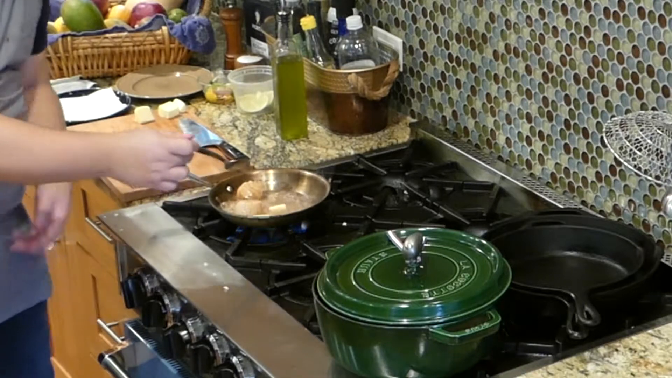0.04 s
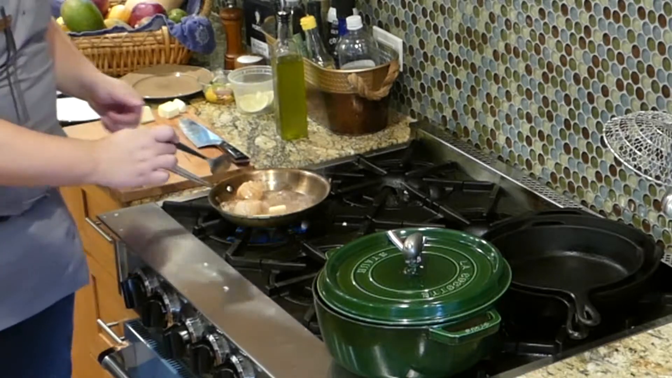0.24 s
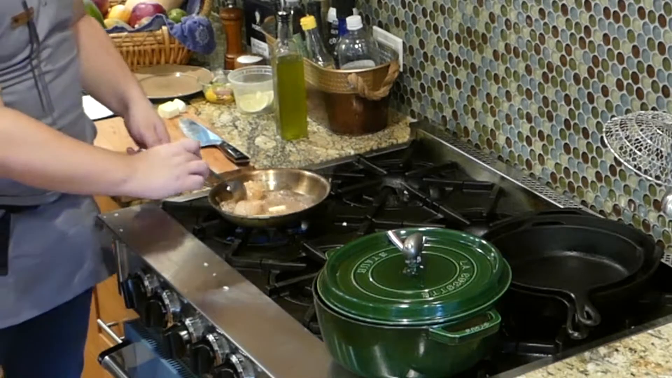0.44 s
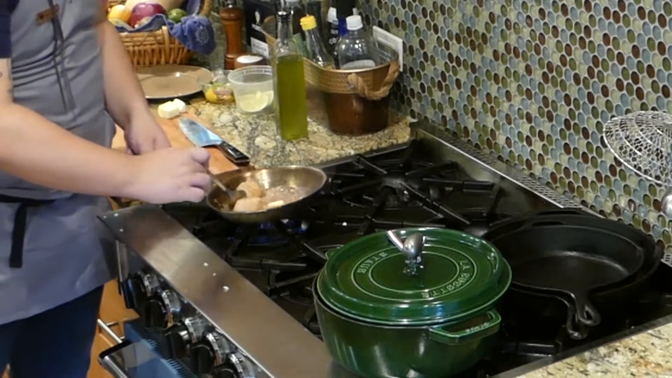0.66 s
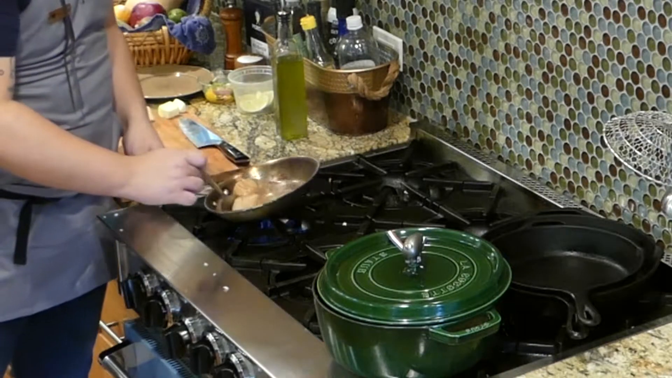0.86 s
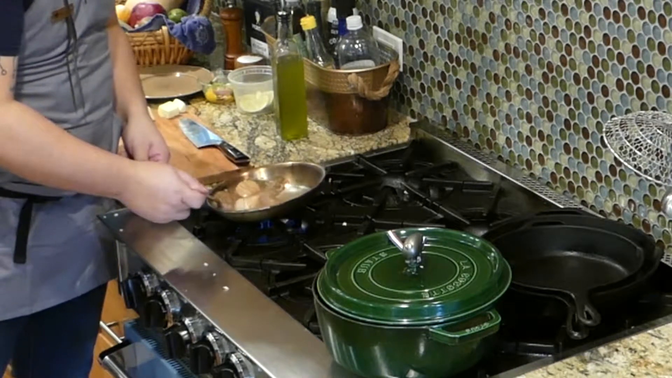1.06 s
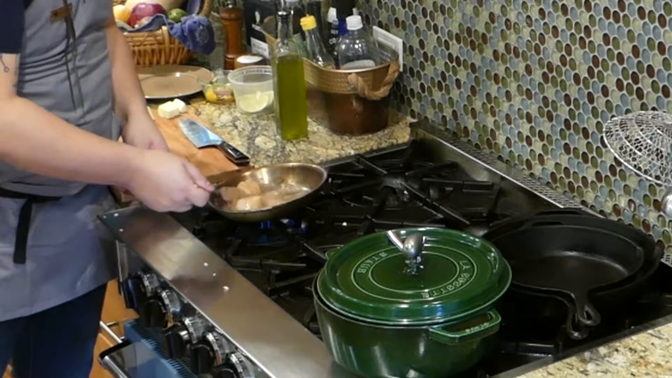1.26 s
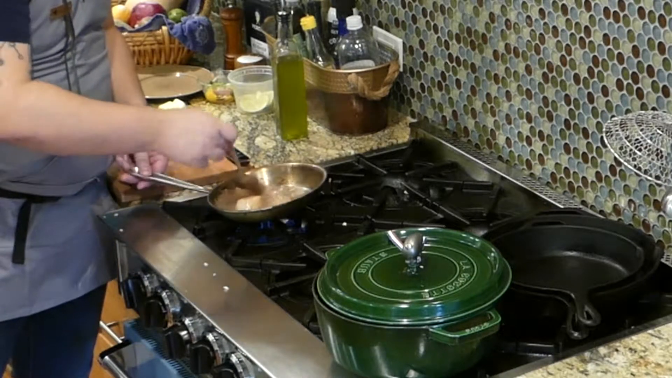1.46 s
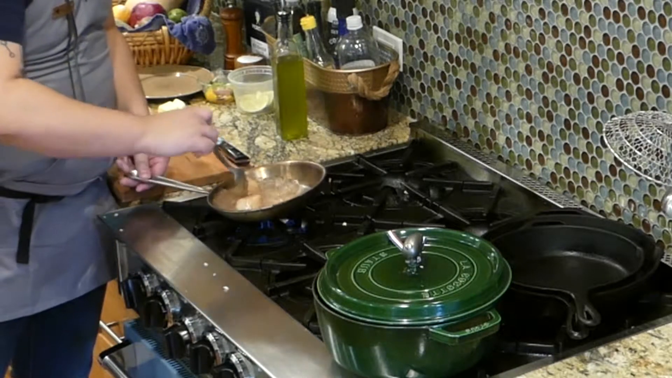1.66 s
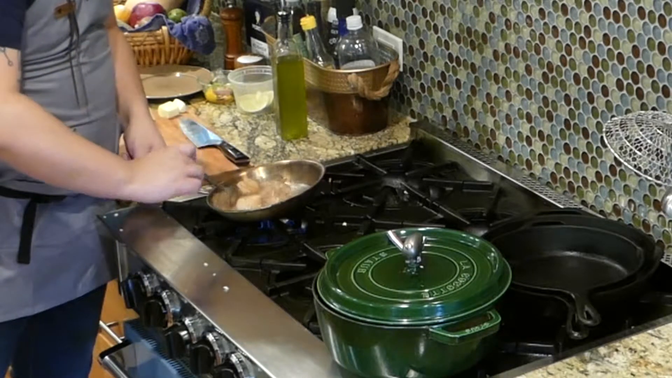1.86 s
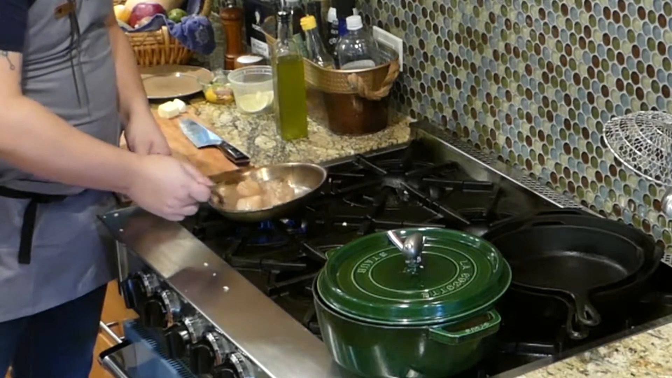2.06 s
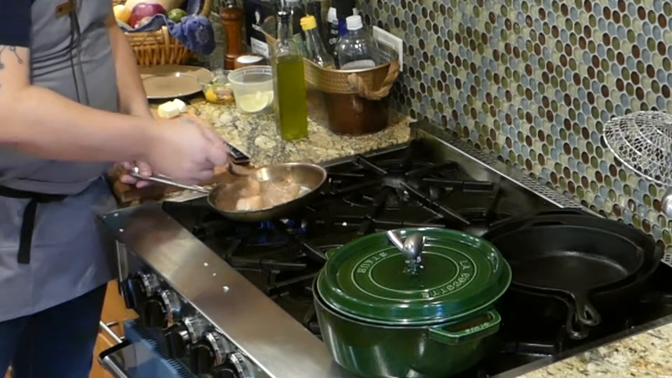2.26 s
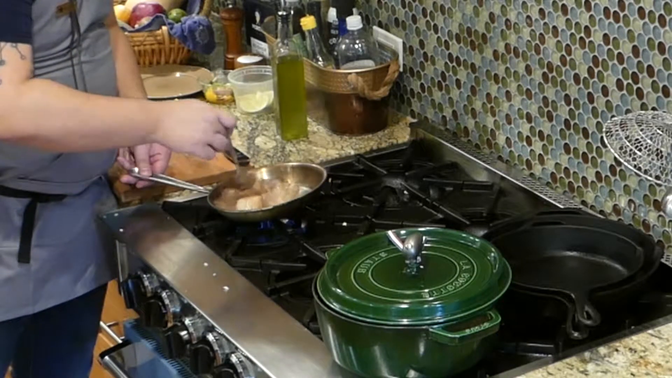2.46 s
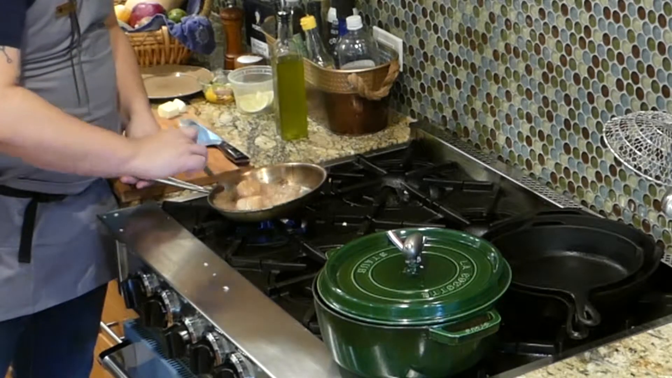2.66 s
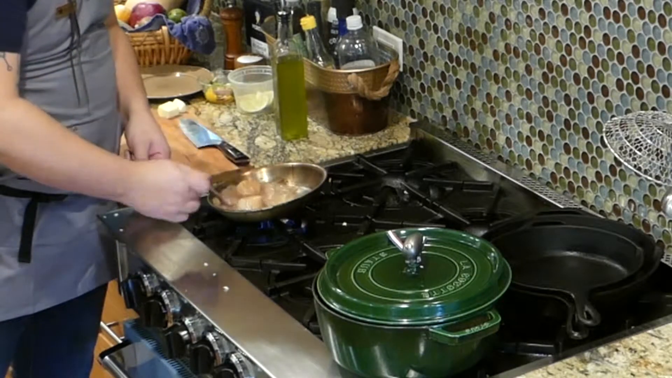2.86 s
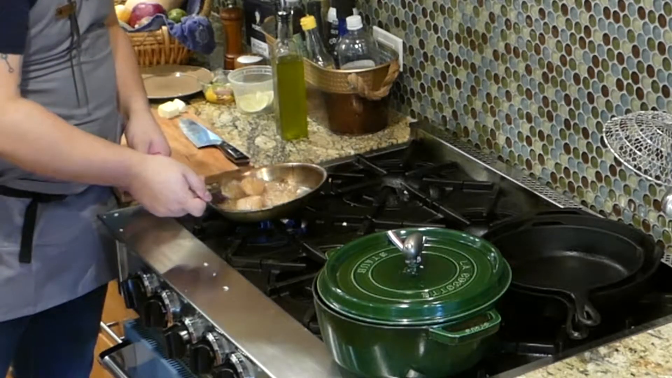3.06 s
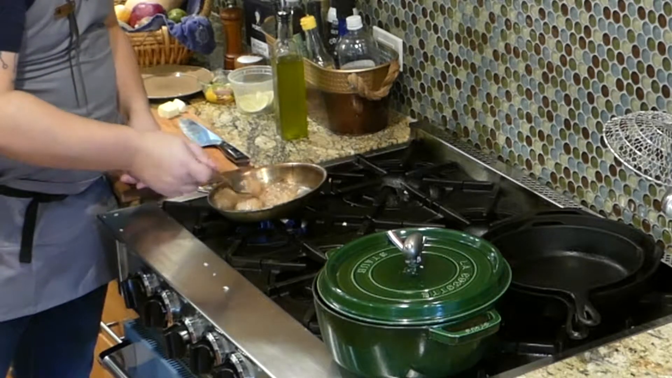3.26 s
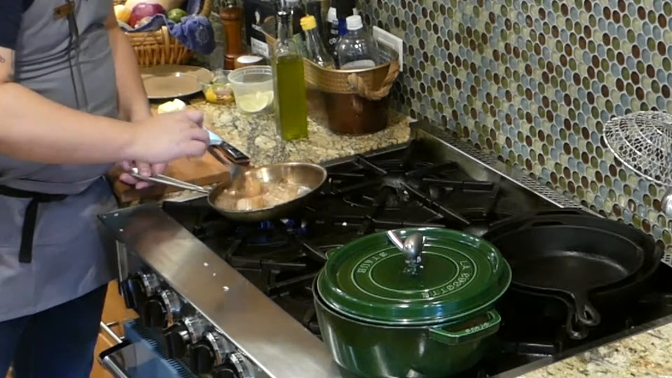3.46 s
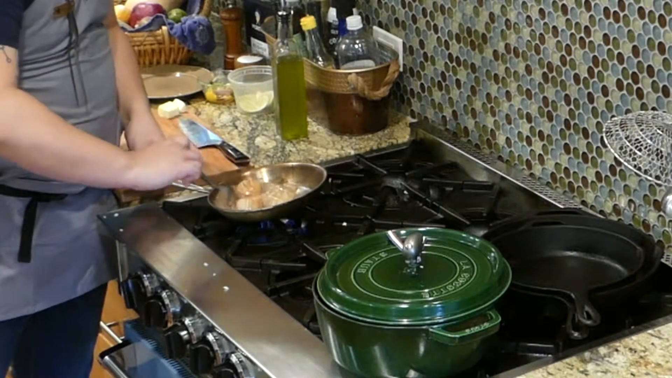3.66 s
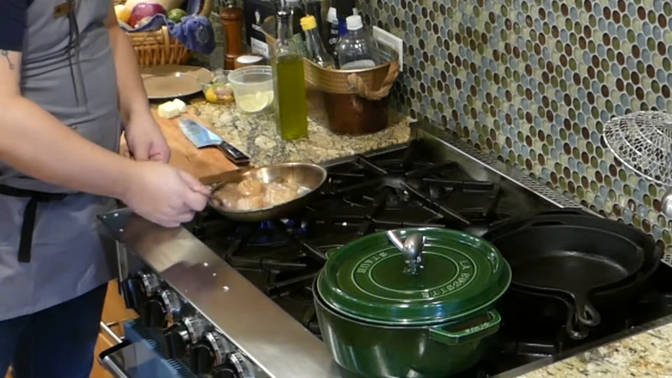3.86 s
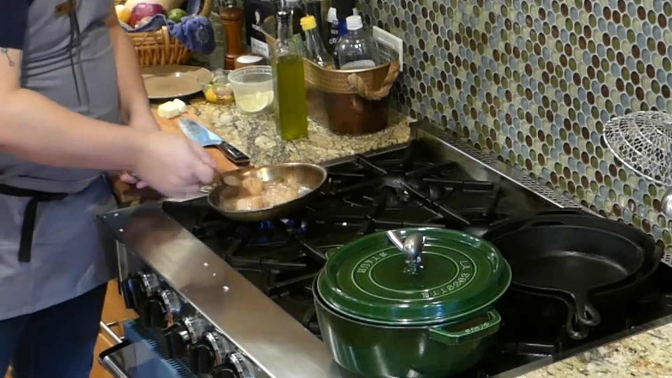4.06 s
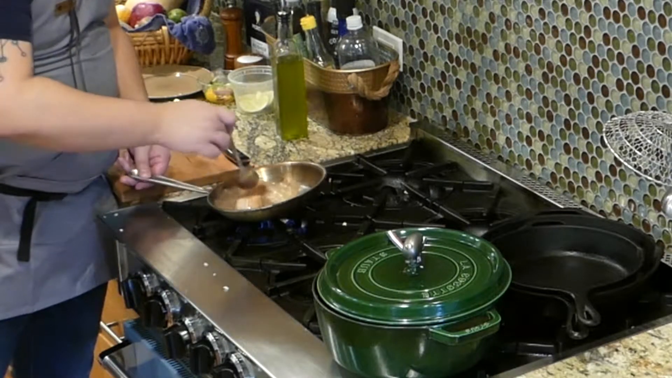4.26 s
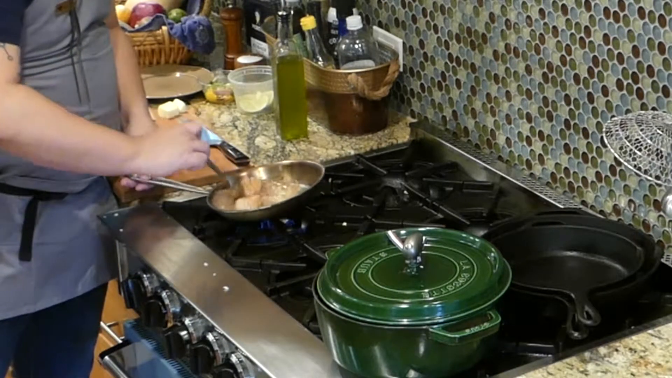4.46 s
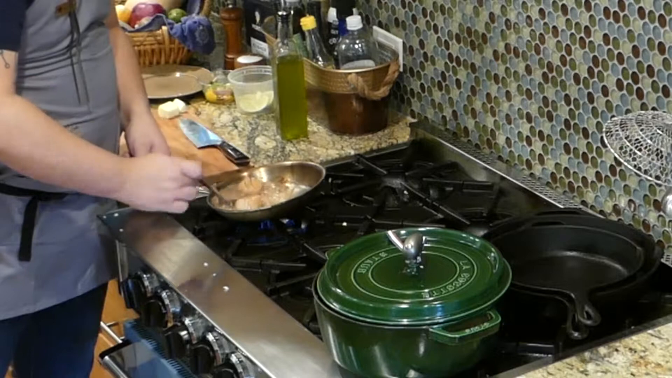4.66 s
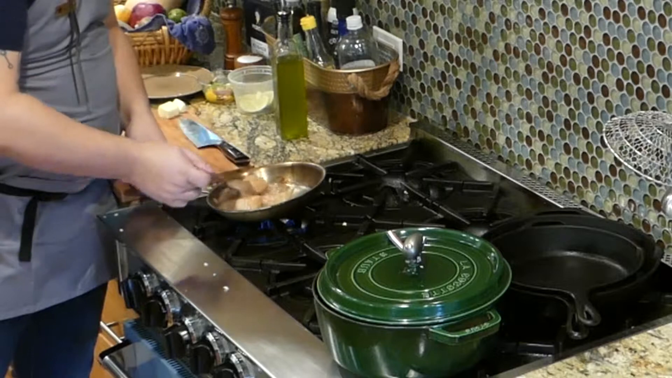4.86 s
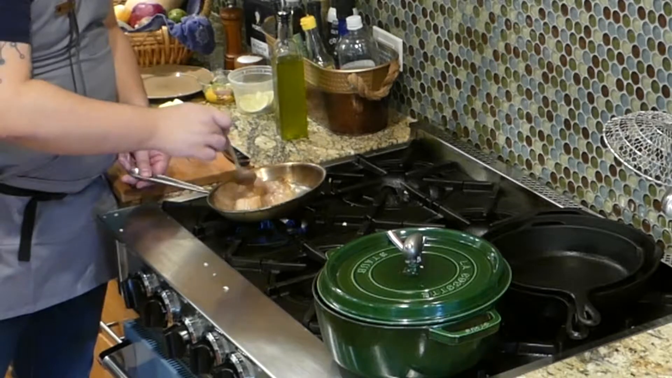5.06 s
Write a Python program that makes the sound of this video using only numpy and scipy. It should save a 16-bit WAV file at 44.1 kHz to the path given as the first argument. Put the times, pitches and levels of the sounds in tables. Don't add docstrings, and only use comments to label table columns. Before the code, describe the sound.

A five-second stretch in a tiled kitchen, picked up in stereo by a camera about two metres away. From the very start butter fizzes, froths and crackles in a steel skillet, with sharp tiny spits, over a steady low roar of hood fan and gas flame. At 0.6 s the pan rocks onto the grate with a short rattling metallic clunk; the fat then washes and gurgles louder until about 1.3 s, with a cluster of pops and a small round drip near 1.15 s. The boil is liveliest around 1.45 s. Then a spoon scoops rhythmically: damped base knocks at 1.95, 2.8, 3.75 and 4.65 s, each followed about 0.2 s later by a rim clink, at 2.1, 3.0, 3.95 and 4.8 s, the first dull, the third brighter. Small drips of poured fat fall near 4.5 s, and a last sizzling swell comes at 4.9 s. Short hard-walled echoes surround everything.

```python
import sys
import numpy as np
from scipy import signal
from scipy.fft import rfft, irfft, next_fast_len
from scipy.io import wavfile
from scipy.ndimage import uniform_filter1d

SR = 44100
rng = np.random.default_rng(int(sys.argv[2]) if len(sys.argv) > 2 else 0)


def pcm_store(signal):
    levels = np.round(np.clip(np.atleast_2d(signal), -1, 1) * 32767)
    wavfile.write(sys.argv[1], SR, levels.astype(np.int16).T)


def invert_db(x):
    u = np.asarray(x, float) / 20
    return 10 ** u


N = 225684

# (frequency [Hz], density [dB per Hz])
HOOD_SPECTRUM = [(12, -70), (20, -42), (53, -39), (72, -12.5), (133, -2), (242, 1), (301, 3), (498, -2.5),
                 (536, -1), (566, -9), (619, 0), (1100, -14.5), (1500, -13), (1950, -33), (3300, -120)]
# (frequency [Hz], density [dB per Hz])
FRY_SPECTRUM = [(700, -17), (1100, -3.5), (1300, -7), (2300, -3), (4000, -1), (6000, -1), (7200, -2),
                (8100, -5.5), (9200, 0.5), (11000, -1.5), (13500, -6), (16000, -14.5)]
# (time [s], vigour of the boil [dB])
PAN_HEAT = [(0, 0), (.5, 0), (1.25, 1.5), (1.45, 4.5), (1.8, 1.5), (2.1, 2), (2.45, 0), (2.8, 2),
            (3.3, 0.5), (4.0, -0.5), (4.7, -1.5), (5.12, 0.5)]
# (time [s], hold [s], swell [dB], bubble pitch [Hz])
FAT_SURGES = [
    (0.67, 0.15, 3.5, 2900),
    (0.88, 0.25, 6, 3400),
    (.84, 0.29, 2.5, 3800),
    (1.65, 0.21, 1.5, 9500),
    (1.1, .06, 7, 1100),
    (1.34, 0.52, 0.5, 7200),
    (2.42, 0.48, 2, 4000),
    (4.47, 0.061, 6.5, 2000),
    (4.89, 0.14, 5, 4600),
]
# (time [s], peak level [dB], pitch [Hz])
FAT_SPITS = [(.0428, -20, 9800), (0.206, -14, 9600), (0.291, -23, 4320), (.922, -19, 4000),
             (.971, -15, 3320), (1.014, -18, 3500), (1.112, -23, 3200), (1.141, -25, 4500),
             (1.156, -21, 3500), (1.168, -18, 2980), (1.202, -20, 3700), (1.428, -21, 5500),
             (1.8838, -18, 7600), (2.0306, -24, 6000), (2.491, -25, 4060), (3.177, -24, 9500),
             (3.19, -21, 10000), (3.268, -24, 10000), (3.412, -18, 10200), (3.673, -28, 3540),
             (3.689, -22, 6000), (3.7232, -14, 10000)]
# (time [s], peak level [dB], pitch [Hz], T60 [s])
SPOON_DRIPS = [
    (.968, -42, 2420, 0.066),
    (1.159, -28, 1700, 0.045),
    (1.164, -46, 1796, 0.033),
    (4.488, -39, 5500, .03),
    (4.523, -39, 2300, 0.032),
    (4.528, -33, 1650, 0.024),
    (4.542, -35, 1350, 0.023),
]
# (time [s], strength [dB], brightness [dB per octave], pitch the struck spot alters [Hz], by [dB])
GRATE_KNOCKS = [
    (.6248, -22.5, -0.5, 6500, -8.5),
]
BASE_KNOCKS = [
    (1.9421, -27.5, 0.3, 1400, 3.5),
    (2.7949, -22.5, -1, 1460, -7.5),
    (3.7529, -23, 0.26, 840, -4.5),
    (4.629, -23.5, 1, 930, 2.5),
]
RIM_KNOCKS = [
    (2.118, -25.5, -2.5, 650, -15),
    (2.9898, -24, -0.86, 1250, -4.5),
    (3.9342, -23, 0.43, 2920, 0),
    (4.801, -23.5, -1.8, 6300, 11.5),
]
# (frequency [Hz], level [dB], T60 [s])
GRATE_MODES = [(1295, -5.5, 0.1), (1526, 6.5, 0.058), (1700, -14, .036), (1910, -3, 0.072),
               (2390, -4, 0.029), (2470, -14, 0.027), (2974, -1.5, 0.02), (2895, 4.5, 0.043),
               (3380, -4.5, 0.047), (3710, -9, 0.032), (4260, -13, .04), (4550, -3, 0.036),
               (5160, -9.5, 0.35), (7100, -11, 0.041), (9100, -15, .031)]
# (frequency [Hz], level [dB], T60 [s])
BASE_MODES = [(189.8, -22, 0.48), (237.4, -15.5, 0.18), (353, -10, 0.097), (477, -9, 0.024),
              (756, -11.5, 0.15), (896, -7, 0.059), (1234, -5.5, 0.071), (1465, 1.5, 0.067),
              (1884, -15, 0.048), (2104, -6, 0.041), (2520, -1, 0.011), (3060, -2.5, 0.016),
              (3310, -7, 0.043), (3960, -9, 0.21), (4380, -1, 0.034), (4960, -0.5, .08),
              (5200, -7.5, 0.059), (6380, -7.5, 0.13), (7160, -9, 0.03), (9480, -11.5, 0.034),
              (10440, -12.5, 0.024)]
RIM_MODE_HZ = (470, 740, 800, 870, 1210, 1380, 1690, 1975, 2300, 2535, 2880, 3185, 3935, 4320, 4990, 5252,
               6050, 6706, 7114, 8750, 10450)
RIM_MODE_DB = (-20.5, -8.5, -8, -16.5, -6, -13.5, -2.5, -1, -7, -2, 3, -7.5, 0, -7.5, -9.5, -3.5, -6, -2.5,
               -4, -13, -4.5)
RIM_MODE_T60 = (.08, .07, .07, .06, .1, .06, .07, .1, .07, .09, .085, .14, .17, .1, .07, .13, .08, .1, .07,
                .04, .05)
# (frequency [Hz], gain [dB])
GRATE_GAIN = [(1300, -1), (1500, 2), (2800, -0.5), (5000, -2.5)]
# (frequency [Hz], gain [dB])
BASE_GAIN = [(250, -4.5), (800, -1.1), (2800, 0), (5500, -5)]
# (frequency [Hz], gain [dB])
RIM_GAIN = [(780, -0.1), (2900, -0.5), (6500, -4.5), (10400, -4)]
# (frequency [Hz], T60 [s])
KITCHEN_T60 = [(200, 0.59), (1000, 0.73), (3000, 0.56), (6000, 0.35), (12000, 0.053)]
# (frequency [Hz], side minus diffuse mid [dB])
STEREO_WIDTH = [(30, -3), (110, -17), (200, -23.5), (380, -16), (700, -5.5), (1300, -4.5), (2400, -7.5),
                (3600, -9), (5000, -20.5), (8000, -16), (15000, -15)]
# (frequency [Hz], width [Hz], gain [dB])
EQUALISER_DIPS = [(584.5, 63, -26), (2658, 96, -55), (1066, 290, -6.5)]

SURGE_RISE_S, SURGE_FALL_S, SURGE_OCTAVES = 0.025, 0.077, 0.66
SLOSH_DB, SLOSH_HOLD_S, SLOSH_HZ = 3, 0.068, 2270
SPIT_CYCLES, SPIT_DB, HIGH_SPIT_DB = 8, 2.5, -2
PIVOT_HZ, SPOT_OCTAVES, SCATTER_DB = 2000, 0.25, 1.5
SWELL_CYCLES = 2.8
ONSET_S, CRACK_T60 = 0.0009, 0.018
RATTLE_DB, RATTLE_T60 = 9, 0.2
ECHO_S, ECHO_DB, ECHO_HZ = 0.0044, 1.5, 5500
SHADOW_HZ, SHADOW_DB = 5600, -8
SPOON_ROOM_DB, FRY_ROOM_DB, FRY_ECHO_DB = -6.5, -7, -6.5


def colour(x, table):
    hz, db = np.transpose(table)
    size = next_fast_len(x.shape[-1])
    f = np.maximum(np.arange(size // 2 + 1) * SR / size, 1)
    gain = invert_db(np.interp(np.log(f), np.log(hz), db))
    return irfft(rfft(x, size) * gain, size)[..., :x.shape[-1]]


def ring(x, hz, t60):
    pole = np.exp(2j * np.pi * min(hz, SR / 2.2) / SR - np.log(1000) / (t60 * SR))
    return signal.lfilter([1], [1, -pole], x).imag


def unit(x):
    return x / np.sqrt(np.mean(x ** 2))


def walk(rate):
    hold = int(SR / rate)
    steps = np.repeat(rng.standard_normal(N // hold + 1), hold)
    return 0.46 * uniform_filter1d(steps, hold)[:N]


def bursts(rate, spread_db):
    chance = rng.random((2, N))
    hit = np.flatnonzero(chance[0] < rate / SR)
    size = np.minimum(-np.log(1 - chance[1, hit]), 5)
    out = np.zeros(N)
    out[hit] = invert_db(spread_db * size) * (-1) ** hit
    return unit(out)


def bell(hz, centre_hz, octaves):
    return np.exp(-0.5 * (np.log2(hz / centre_hz) / octaves) ** 2)


def hood():
    roar = colour(rng.standard_normal((2, N)), HOOD_SPECTRUM)
    return invert_db(-49.5 + 0.35 * walk(2.8)) * unit(roar)


def vigour(hz):
    t = np.arange(0, N + 200, 200) / SR
    db = np.interp(t, *np.transpose(PAN_HEAT))
    knocks = [*GRATE_KNOCKS, *BASE_KNOCKS, *RIM_KNOCKS]
    sloshes = [(knock[0], SLOSH_HOLD_S, SLOSH_DB, SLOSH_HZ) for knock in knocks]
    for s, hold, swell_db, surge_hz in [*FAT_SURGES, *sloshes]:
        rise = np.clip((t - s) / SURGE_RISE_S, 0, 1)
        fall = np.exp(-np.maximum(t - s - SURGE_RISE_S - hold, 0) / SURGE_FALL_S)
        db = db + swell_db * bell(hz, surge_hz, SURGE_OCTAVES) * rise * fall
    return np.interp(np.arange(N) / SR, t, db)


def frying():
    cracks, seethe, out = bursts(1500, spread_db=2.3), walk(12), 0
    for hz in 700 * 2 ** np.arange(0, 4.6, 1 / 4):
        db = vigour(hz) + 0.81 * seethe + 1.7 * walk(25.2)
        clicks = bursts(0.6 * hz, spread_db=1.0) + 0.36 * cracks
        bubbles = unit(ring(invert_db(db) * clicks, hz, t60=6.1 / hz))
        out = out + np.sqrt(hz) * bubbles * np.sqrt(np.mean(invert_db(2 * db)))
    return invert_db(-42.0) * unit(colour(out, FRY_SPECTRUM))


def spits():
    out, t = np.zeros(N + SR), np.arange(SR // 5) / SR
    pops = [(*row, SPIT_CYCLES / row[2], 0) for row in FAT_SPITS]
    drips = [(*row, 1.5) for row in SPOON_DRIPS]
    for s, db, hz, t60, rise in pops + drips:
        swell = np.minimum(t * 8.6 / t60, 1)
        decay = invert_db(db + SPIT_DB + HIGH_SPIT_DB * (hz > 7000) - 60 * t / t60)
        tone = np.sin(2 * np.pi * hz * (t + rise * t ** 2))
        out[int(s * SR):][:len(t)] += swell * decay * tone
    return out[:N]


def blows(hits, modes, reach, crack_db, rattle_db, rattle_t60):
    out, t = np.zeros(N + SR), np.arange(SR // 2) / SR
    hz, db, t60 = np.transpose(modes)[:, :, None]
    reach_hz, reach_db = np.transpose(reach)
    db = db + np.interp(np.log(hz), np.log(reach_hz), reach_db)
    for s, strength_db, bright_db, spot_hz, spot_db in hits:
        chance = rng.standard_normal((2, len(modes), 1))
        tilt_db = bright_db * np.log2(hz / PIVOT_HZ)
        db_here = db + strength_db + tilt_db + spot_db * bell(hz, spot_hz, SPOT_OCTAVES)
        decay = invert_db(db_here + SCATTER_DB * chance[0] - 60 * t / t60)
        body = decay * np.sin(2 * np.pi * hz * (1 + 0.0011 * chance[1]) * t)
        body = body * np.minimum(t * hz / SWELL_CYCLES, 1)
        outline = [(hz.min() / 1.15, -60), *zip(hz.flat, db_here.flat), (hz.max() * 1.77, -60)]
        crowd = colour(rng.standard_normal(len(t)), outline)
        crack = invert_db(crack_db - 60 * t / CRACK_T60)
        rattle = invert_db(rattle_db - 60 * t / rattle_t60)
        onset = np.sin(np.pi / 2 * np.minimum(t / ONSET_S, 1)) ** 2
        out[int(s * SR):][:len(t)] += (body.sum(axis=0) + crowd * (crack + rattle)) * onset
    return out[:N]


def spoon_and_pan():
    rim_modes = list(zip(RIM_MODE_HZ, RIM_MODE_DB, RIM_MODE_T60))
    grate = blows(GRATE_KNOCKS, GRATE_MODES, GRATE_GAIN, 24.0, RATTLE_DB, RATTLE_T60)
    base = blows(BASE_KNOCKS, BASE_MODES, BASE_GAIN, 18.5, RATTLE_DB, RATTLE_T60)
    rim = blows(RIM_KNOCKS, rim_modes, RIM_GAIN, crack_db=8.5, rattle_db=3.5, rattle_t60=0.1)
    return signal.sosfilt(signal.butter(2, 140, "high", fs=SR, output="sos"), grate + base + rim)


def dull(hz, above_db):
    gain = invert_db(2 * above_db)
    response = signal.firwin2(127, [0, hz / 1.2, hz * 1.2, SR / 2], [1, 1, gain, gain], fs=SR)
    return signal.minimum_phase(response)


def kitchen(x, direct, echo, echo_s, room_db):
    t = np.arange(SR // 2) / SR
    room_hz, room_t60 = np.transpose(KITCHEN_T60)
    tail = 0
    for hz in 125 * 2 ** np.arange(0, 7.1, 1):
        t60 = np.interp(np.log(hz), np.log(room_hz), room_t60)
        edges = (hz / np.sqrt(2), min(hz * np.sqrt(2), SR / 2.2))
        band = signal.butter(1, edges, "band", fs=SR, output="sos")
        tail = tail + signal.sosfilt(band, rng.standard_normal((2, len(t)))) * invert_db(-60 * t / t60)
    tail = tail * np.clip((t - 0.002) / 0.012, 0, 1)
    tail = invert_db(room_db) * tail / np.sqrt(np.sum(tail ** 2, axis=1, keepdims=True))
    tail[0, int(echo_s * SR):][:len(echo)] += echo
    tail[0, :len(direct)] += direct
    return signal.fftconvolve(x[None], tail)[:, :N]


def scene():
    fan_mid, fan_side = hood()
    fat = frying() + spits()
    shadow = dull(SHADOW_HZ, SHADOW_DB)
    pan = kitchen(spoon_and_pan(), shadow, [invert_db(ECHO_DB)], ECHO_S, SPOON_ROOM_DB)
    pan[1] *= invert_db(-3.5)
    share = invert_db(16.5 * np.array([walk(40) for _ in range(4)]))
    share = share / np.sqrt(np.sum(share ** 2, axis=0))
    echo = invert_db(FRY_ECHO_DB) * dull(ECHO_HZ, -26)
    for spot, weight in enumerate(share):
        echo_s = ECHO_S + 0.00027 * (spot - 1.5)
        pan = pan + kitchen(weight * fat, [1], echo, echo_s, FRY_ROOM_DB)
    mid, side = pan
    side = colour(invert_db(2.5) * side + fan_side, STEREO_WIDTH)
    return mid + fan_mid + np.array([side, -side])


def roll_off(x):
    return signal.sosfilt(signal.butter(12, 16360, fs=SR, output="sos"), x)


def record(dry):
    x = signal.sosfilt(signal.butter(2, 70, "high", fs=SR, output="sos"), dry)
    x = signal.sosfilt(signal.ellip(10, 0.3, 70, 15950, fs=SR, output="sos"), x)
    for hz, width_hz, db in EQUALISER_DIPS:
        peak = signal.lfilter(*signal.iirpeak(hz, hz / width_hz, SR), x)
        x = x - (1 - invert_db(db)) * peak
    return roll_off(x)


dry = scene()
out = record(dry)
pcm_store(out)
```